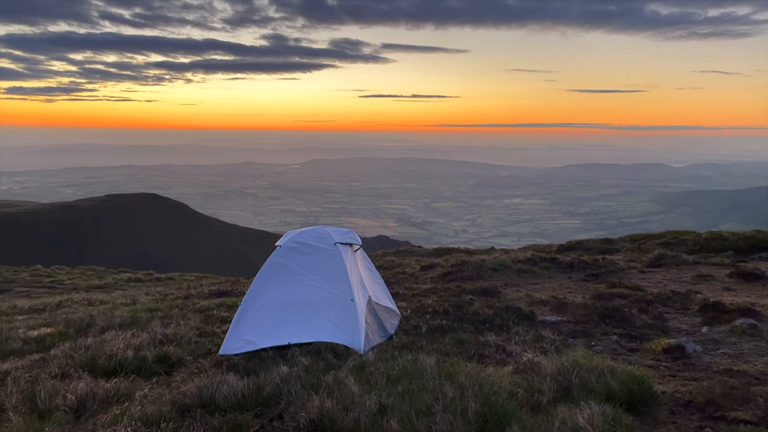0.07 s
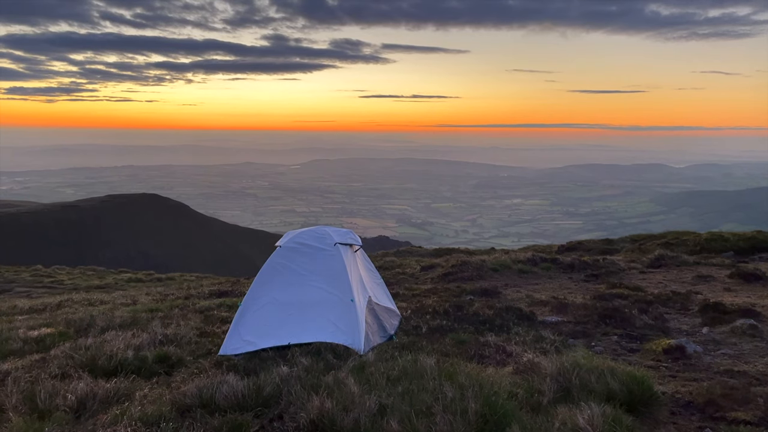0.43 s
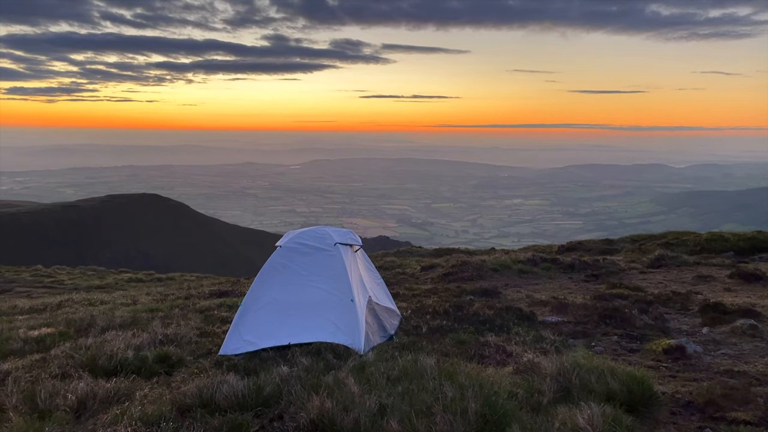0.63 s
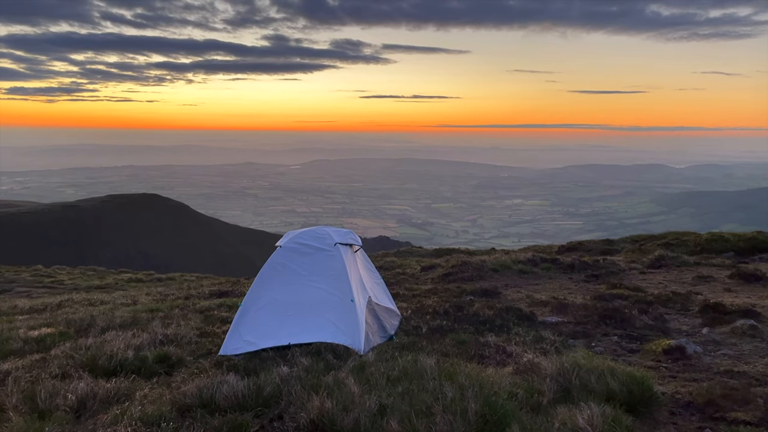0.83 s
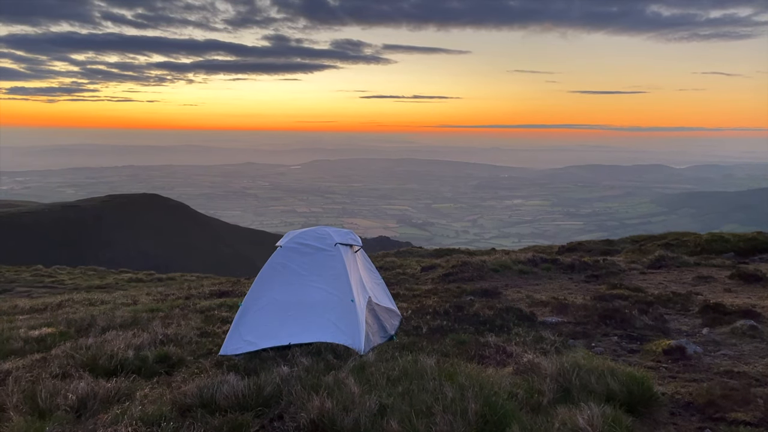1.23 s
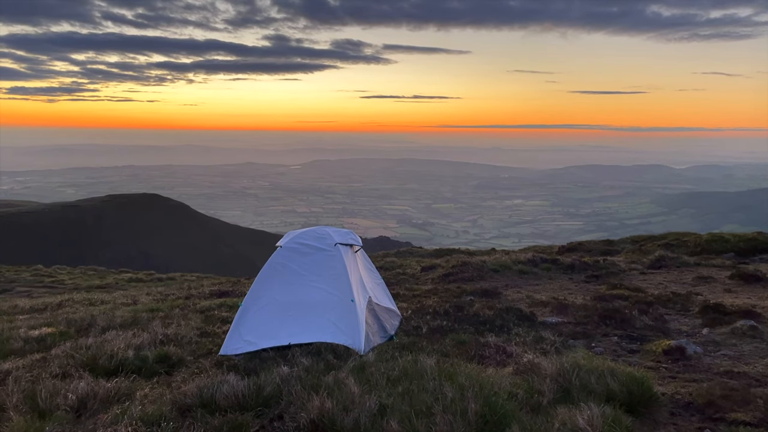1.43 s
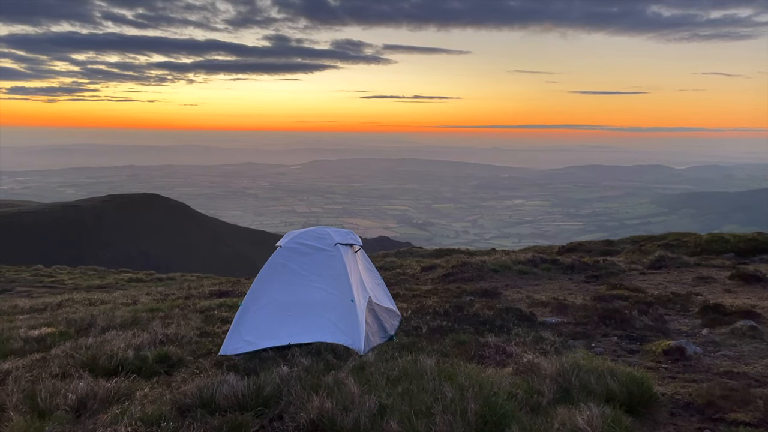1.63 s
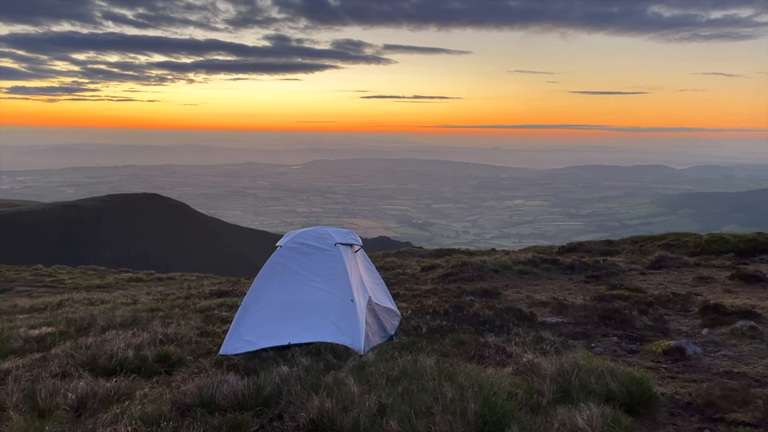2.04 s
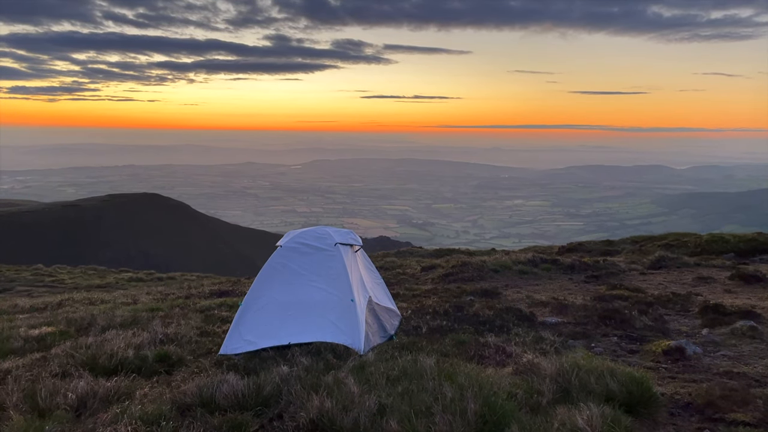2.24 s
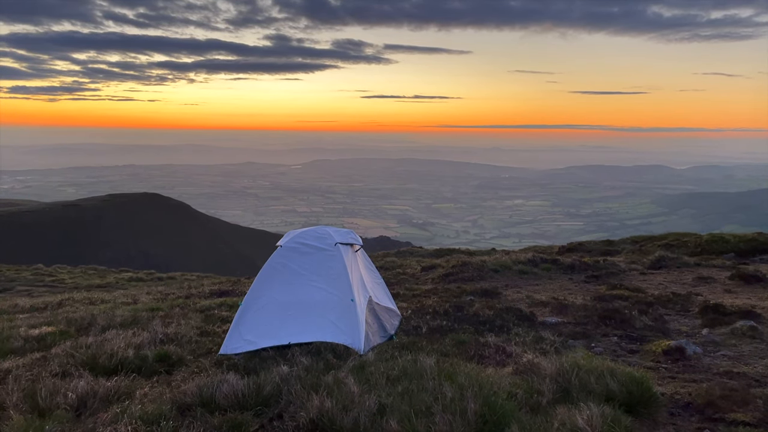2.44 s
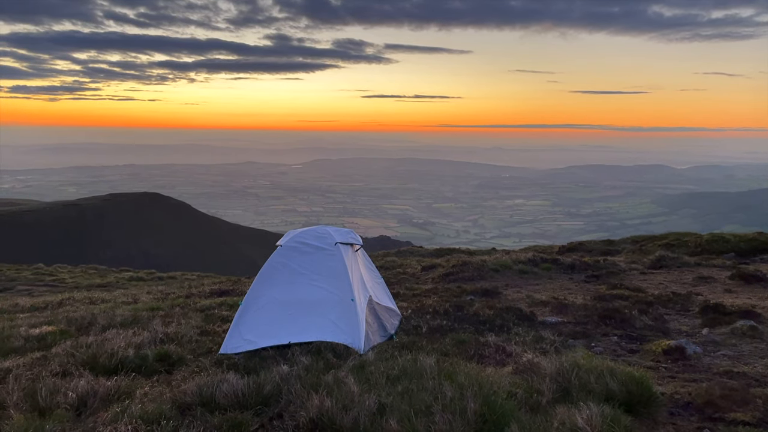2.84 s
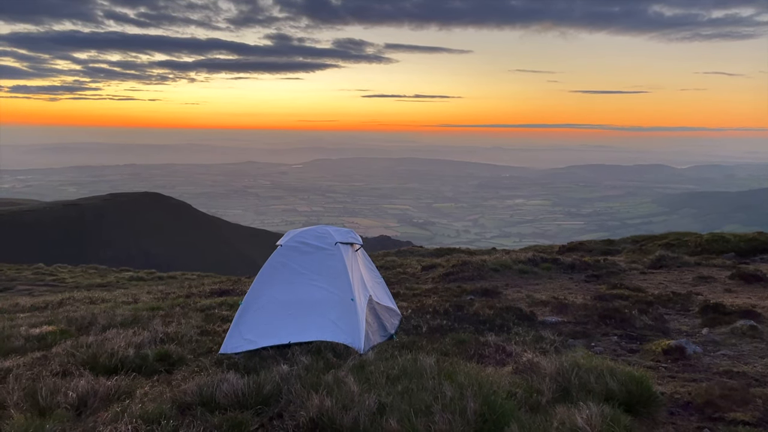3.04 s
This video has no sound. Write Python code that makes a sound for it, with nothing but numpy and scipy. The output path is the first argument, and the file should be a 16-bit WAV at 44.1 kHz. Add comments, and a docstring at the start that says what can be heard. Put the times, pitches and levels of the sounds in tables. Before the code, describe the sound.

Small birds warble a quick run of high, gliding whistles on an open hilltop, with dull echoes and fainter birds farther off. Light wind rumbles underneath and briefly buffets the microphone before the song thins to a few chirps.

```python
"""Small birds warble a quick run of gliding whistles on an open hilltop at dawn. Slopes and ground
scatter the song back as dull echoes. Other birds answer from farther off, blurred by many paths,
over a faint remote chorus. A light wind rumbles on the microphone and now and then buffets it
with eddies; steady far wind and a low drone lie underneath."""
import sys
import numpy as np
from scipy import signal
from scipy.io import wavfile
from scipy.ndimage import map_coordinates

SR = 44100
rng = np.random.default_rng(int(sys.argv[2]) if len(sys.argv) > 2 else 0)


def to_wav(sig):
    """Store sig (one row per channel, or 1-D mono) as 16-bit WAV at the path in sys.argv[1].

    Samples outside -1..1 are clipped; the rate is SR.
    """
    pcm = np.clip(np.atleast_2d(sig), -1, 1) * 32767
    pcm = np.round(pcm).astype(np.int16)
    wavfile.write(sys.argv[1], SR, pcm.T)  # frames by channels


N = 141120
TIME = np.arange(N) / SR


def from_db(db):
    """Decibels to gain."""
    return 10 ** (np.asarray(db) / 20)


def unit_rms(x):
    """Scale to unit power."""
    return x / np.sqrt(np.mean(np.abs(x) ** 2) + 1e-20)


def bandpass(x, low_hz, high_hz, order):
    """Butterworth band-pass."""
    return signal.sosfilt(signal.butter(order, [low_hz, high_hz], "band", fs=SR, output="sos"), x)


def drift(rate_hz):
    """Smooth random motion of spread 1."""
    pole = np.exp(-20 * np.pi * rate_hz / SR)  # runs at SR / 10
    white = rng.standard_normal(N // 10 + 4002)
    slow = signal.lfilter([1], [1, -2 * pole, pole * pole], white)[4000:]
    return np.interp(np.arange(N) / 10, np.arange(len(slow)), unit_rms(slow))


def blurred_tone(hz, width_hz):
    """A tone arriving by many paths: level and phase wander."""
    wander = drift(width_hz) + 1j * drift(width_hz)
    return unit_rms(np.real(wander * np.exp(2j * np.pi * hz * TIME)))


def banded_noise(spectrum, flicker_db, flicker_hz):
    """Half-octave noise bands that flicker partly together; unit power."""
    points_hz, points_db = np.transpose(spectrum)
    out, common, white = 0, drift(flicker_hz), rng.standard_normal((2, N))
    for k, hz in enumerate(24 * 2 ** (np.arange(20) / 2)):
        if points_hz[0] / 1.5 < hz < 1.5 * points_hz[-1]:
            band = bandpass(white[k % 2], hz / 1.19, hz * 1.19, order=4)
            band_db = np.interp(np.log(hz), np.log(points_hz), points_db)
            out += from_db(band_db + flicker_db * (common + drift(flicker_hz))) * band
    return unit_rms(out)


# Gusts: peak t/s, rise/dB, half width/s
GUSTS = [(.275, 6, 0.072), (0.949, 6.5, 0.038), (1.092, 8, 0.1), (1.326, 9, 0.037), (1.455, 9, 0.041),
         (1.913, 14.5, 0.065), (2.088, 5, 0.063)]

def gust_gain():
    """Bell-shaped gusts lift the wind above the calm."""
    return from_db(sum(db * np.exp(-((TIME - peak_s) / width_s) ** 2) for peak_s, db, width_s in GUSTS))


# Wind spectra: f/Hz, relative density/dB
RUMBLE_SPECTRUM = [(22, -13.5), (50, -2.5), (75, -1), (110, -6.5), (160, -10.5), (250, -21.5), (500, -58)]
RUSH_SPECTRUM = [(100, -6.5), (200, 4.5), (450, -1.5), (650, -9), (1000, -20.5), (2000, -36), (4000, -46)]
FAR_WIND_SPECTRUM = [(100, -6.5), (500, -1), (900, -3.5), (1600, -23.5), (3000, -28), (7000, -39.5),
                     (15000, -43.5)]

def wind():
    """Gusts rumble and rush at the microphone over steady far wind."""
    rumble = from_db(-37) * banded_noise(RUMBLE_SPECTRUM, flicker_db=2.5, flicker_hz=24.8)
    rush = from_db(-43.5) * banded_noise(RUSH_SPECTRUM, flicker_db=3.0, flicker_hz=27.2)
    far_wind = from_db(-49) * banded_noise(FAR_WIND_SPECTRUM, flicker_db=-1.05, flicker_hz=4.6)
    return gust_gain() * (rumble + rush) + far_wind


def drone():
    """A low, continuous, wavering hum."""
    return from_db(-44.5) * blurred_tone(116.35, width_hz=3.8)


# Chorus spectrum: f/Hz, relative density/dB
CHORUS_SPECTRUM = [(1750, -25.5), (2350, 5.5), (3000, 2), (5000, -2.5), (6000, -21), (8000, -30.5)]

def chorus():
    """Many remote birds merge into flickering noise."""
    return from_db(-60.5) * banded_noise(CHORUS_SPECTRUM, flicker_db=1, flicker_hz=20)


def thin_call():
    """One faint, very high bird swells and fades."""
    swell = np.exp(-((TIME - 0.077) / 0.17) ** 2)
    return from_db(-68.5) * swell * blurred_tone(7520, width_hz=670)


# Far birds' whistles: start t/s, length/s, f/Hz, level/dB
FAR_WHISTLES = [ (0, 0.0063, 4000, -47.5), (0, 0.29, 4880, -57), (.27, 0.057, 3130, -55.5),
                (0.294, .015, 4180, -48), (0.422, 0.063, 2436, -55.5), (0.982, 0.12, 2310, -58.5),
                (0.995, .15, 4940, -55.5), (1.258, 0.13, 4960, -57.5), (1.271, 0.098, 3500, -51.5),
                (1.504, 0.07, 2214, -55.5), (1.76, 0.22, 5015, -56), (2.297, 0.12, 4840, -55),
                (2.56, 0.057, 2350, -53.5), (2.654, .03, 2120, -54.5), (2.859, 0.21, 5020, -54),
                (3.06, 0.054, 4300, -51.5)]

def far_birds(attack_s=0.002, fade_s=0.058):
    """Whistles blurred by distance swell, hold and fade."""
    out = np.zeros(N)
    for start_s, length_s, hz, db in FAR_WHISTLES:
        t = TIME - start_s
        rise = np.clip(t / (attack_s + length_s / 10), 0, 1)
        fade = np.exp(-np.clip((t - length_s) / fade_s, 0, 20))
        out += from_db(db) * rise * fade * blurred_tone(hz, width_hz=158)
    return out


# Near birds' syllables: start t/s, length/s, level/dB, f/Hz at even steps through the syllable
SONG_SYLLABLES = [ (.138, 0.046, -40.5, [3460, 3650, 3760, 4040]),
                  (.166, 0.04, -47, [3930, 5090, 4050, 3560]),
                  (.348, 0.029, -41, [3520, 3640, 4120, 4020, 4050]),
                  (.42, 0.1, -49, [3210, 3450, 3390, 3080]),
                  (.464, 0.074, -42, [2820, 2854, 2800, 2690, 2710]),
                  (.59, 0.031, -46.5, [3770, 3800, 3530, 2820]),
                  (.61, 0.041, -42, [3050, 4120, 3635, 3230, 2400]),
                  (.652, 0.055, -40.5, [2440, 3060, 3225, 3330, 3460]),
                  (.712, 0.06, -41.5, [3350, 3845, 4180, 4200, 3870, 3000]),
                  (.759, 0.03, -38.5, [3420, 4790, 3860, 3640, 3740]),
                  (.871, 0.03, -45, [3730, 3730, 3520, 2840]),
                  (.889, 0.032, -41, [3050, 4360, 3730, 3570, 3020, 2430]),
                  (.931, 0.055, -38, [2430, 3050, 3157, 3295, 3320]),
                  (.968, 0.043, -49.5, [4800, 5080, 5080, 4880, 4400]),
                  (1.002, 0.041, -39.5, [3840, 4216, 4120, 3680, 3180]),
                  (1.037, 0.031, -37, [3430, 4450, 3940, 3640, 3380]),
                  (1.136, 0.028, -44, [4840, 4880, 5300, 5590, 6440, 5200]),
                  (1.18, 0.063, -40, [4080, 4280, 4370, 4080, 3740, 3770, 3840]),
                  (1.318, 0.042, -39, [3520, 3300, 3095, 3340, 3350, 2400]),
                  (1.414, .042, -41.5, [2500, 2970, 3070, 3120]),
                  (1.47, 0.067, -38.5, [3056, 3154, 3080, 2950, 2575, 1900]),
                  (1.567, 0.034, -46, [3300, 3430, 3360]), (1.613, 0.034, -43, [3170, 2890, 2290, 1960]),
                  (1.666, 0.025, -50.5, [2250, 3980, 3750, 3300]),
                  (1.683, 0.043, -35.5, [3530, 2950, 2723, 2682, 2620]),
                  (1.8, 0.039, -36, [3035, 3254, 3290, 3030]),
                  (1.834, .053, -40.5, [2740, 2650, 2710, 2413, 1890]),
                  (1.966, 0.013, -38, [5300, 2490, 2380]), (2.004, 0.018, -36.5, [2750, 4130, 3660, 2900]),
                  (2.01, 0.043, -48, [4650, 5160, 4100]), (2.06, 0.03, -34.5, [3820, 3680, 3370, 2820]),
                  (2.086, 0.034, -33, [3250, 3610, 3636, 3700]),
                  (2.105, 0.095, -50, [5580, 5200, 4660, 4500, 4600]),
                  (2.18, 0.077, -48, [4470, 4640, 4900, 5300, 4700]),
                  (2.173, .066, -44, [2497, 3080, 3600, 3950, 4260]),
                  (2.226, 0.078, -40.5, [4123, 3900, 3330, 2910, 2670, 2465]),
                  (2.876, 0.059, -42, [3750, 3600, 3710, 4150, 3800, 3540]),
                  (3.034, 0.043, -44, [3960, 4510, 5220, 4130, 4140]),
                  (3.158, 0.056, -42, [4410, 4520, 4200, 3700])]
# Harmonics 2 and 3: relative level/dB
OVERTONES_DB = [-39, -47]

def birdsong(syllables, attack_s=0.0037, release_s=0.0026, swell_db=11, half_power_hz_per_s=170000):
    """Almost pure gliding whistles; each swells mid-syllable and weakens where it glides fastest."""
    out = np.zeros(N)
    pitch_waver, waver_db = 1 + 0.0086 * drift(230), 2.5 * drift(60)
    for start_s, length_s, db, pitches_hz in syllables:
        on = (TIME >= start_s) & (TIME < start_s + length_s)
        t = TIME[on] - start_s
        position = t / length_s * (len(pitches_hz) - 1)
        hz = map_coordinates(np.array(pitches_hz, float), [position], order=3, mode="nearest")
        ramp = np.clip(np.minimum(t / attack_s, (length_s - t) / release_s), 0, 1)
        gate = np.sin(np.pi / 2 * ramp) ** 2
        swell = from_db(db - swell_db * (2 * t / length_s - 1) ** 2 + waver_db[on])
        glide_loss = np.hypot(1, np.gradient(hz) * SR / half_power_hz_per_s)
        phase = 2 * np.pi * np.cumsum(hz * pitch_waver[on]) / SR
        overtones = sum(gain * np.sin(k * phase) for k, gain in enumerate(from_db(OVERTONES_DB), 2))
        out[on] += np.sqrt(2) * gate * swell / glide_loss * (np.sin(phase) + overtones)
    return out


def hillside(sound, t60_s, build_s, cutoff_hz=5470):
    """Rough ground scatters a sound into a dull, dying wash of small echoes."""
    t = TIME[:SR]
    build_up = 1 - np.exp(-(t / build_s) ** 2)
    echoes = rng.standard_normal(SR) * from_db(-60 * t / t60_s) * build_up
    dulled = signal.sosfilt(signal.butter(12, cutoff_hz, fs=SR, output="sos"), sound)
    return signal.fftconvolve(dulled, echoes / np.linalg.norm(echoes))[:N]


# Eddies hitting the microphone: peak t/s, push level/dB, f/Hz
EDDIES = [(0.2589, -20, 360), (0.2943, -24, 720), (1.474, -26, 760), (1.9037, -18.5, 490), (1.908, -9, 304),
          (1.9227, -14.5, 384), (1.932, -23.5, 540), (2.194, -21.5, 510), (2.699, -29, 314)]

def buffets(push_cycles=0.63, flutter_s=0.011, stir_s=0.017, stir_low_hz=432, stir_high_hz=918):
    """Each eddy gives a push and a flutter; eddies and gusts also stir each microphone port separately."""
    knocks = np.zeros(N)
    stir = from_db(-55) * (gust_gain() - 1)
    for peak_s, db, hz in EDDIES:
        away_s = np.abs(TIME - peak_s)
        push = -np.cos(2 * np.pi * away_s * hz) * np.exp(-(away_s * hz / push_cycles) ** 2)
        turbulence = unit_rms(bandpass(rng.standard_normal(N), hz / 2, hz * 1.2, order=3))
        flutter = from_db(-16.5) * turbulence * np.exp(-away_s / flutter_s)
        knocks += from_db(db) * (push + flutter)
        stir_peak = from_db(-31 + 0.62 * db) * hz / stir_low_hz  # small, fast eddies stir more
        stir = np.maximum(stir, stir_peak * np.exp(-away_s / stir_s))
    port_noise = bandpass(rng.standard_normal((2, N)), stir_low_hz, stir_high_hz, order=3)
    return knocks + stir * unit_rms(port_noise)


def twitter(from_s=0.9, to_s=2.15, rate_per_s=24, length_s=0.045, level_db=-52):
    """Remote birds sing faint syllables with random timing and glides."""
    draws = rng.standard_normal((60, 5))
    starts_s = from_s + (np.arange(len(draws)) + 0.5 * draws[:, 0]) / rate_per_s
    glides_hz = 3454 + 550 * draws[:, 1:]
    return birdsong([(start_s, length_s, level_db, glide_hz)
                     for start_s, glide_hz in zip(starts_s, glides_hz) if 0 < start_s < to_s])


def scene():
    """Birds lie straight ahead, the twitter heard only by its echoes; only the port stir has width."""
    song = birdsong(SONG_SYLLABLES)
    slope_echoes = from_db(-12) * hillside(song, t60_s=0.82, build_s=0.034)
    ground_echoes = from_db(-9.5) * hillside(song, t60_s=0.16, build_s=0.009)
    twitter_echoes = hillside(twitter(), t60_s=0.12, build_s=0.0013)
    distant_birds = twitter_echoes + chorus() + thin_call() + far_birds()
    return song + slope_echoes + ground_echoes + distant_birds + buffets() + wind() + drone()


def record(dry):
    """Steep low-pass at 15750 Hz."""
    return signal.sosfiltfilt(signal.ellip(10, 0.1, 70, 15750, fs=SR, output="sos"), dry)


dry = scene()
out = record(dry)
to_wav(out)
```